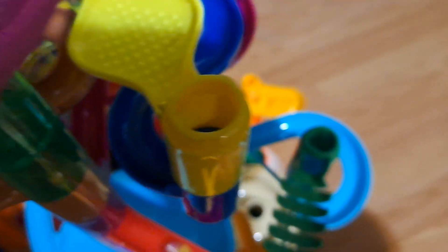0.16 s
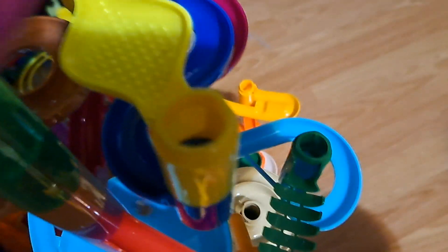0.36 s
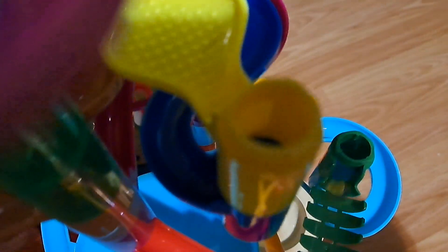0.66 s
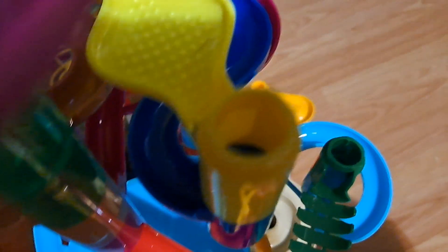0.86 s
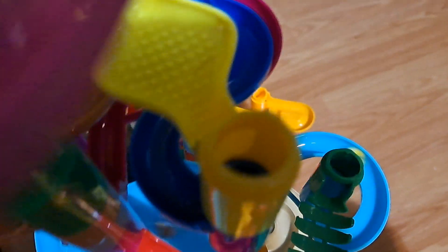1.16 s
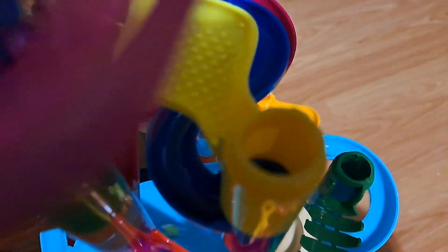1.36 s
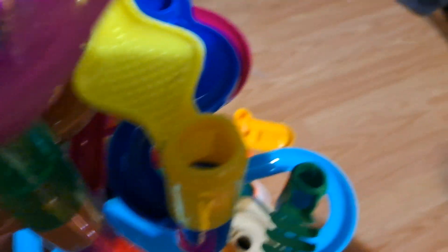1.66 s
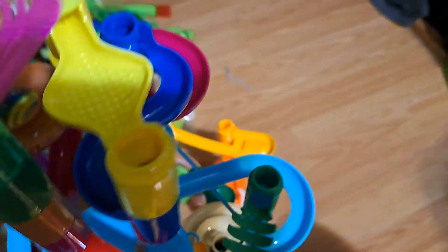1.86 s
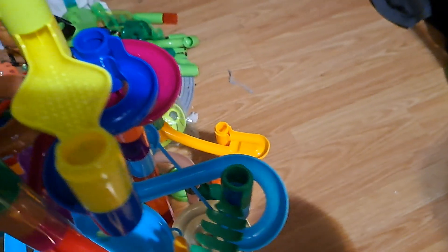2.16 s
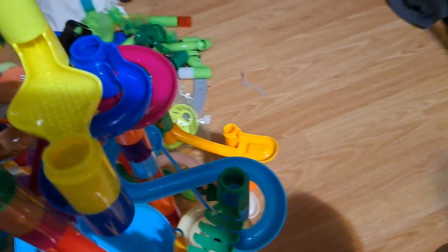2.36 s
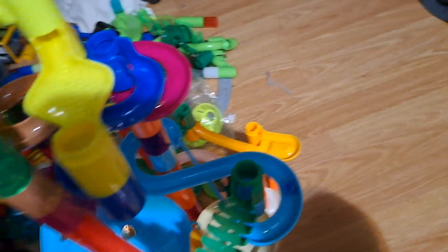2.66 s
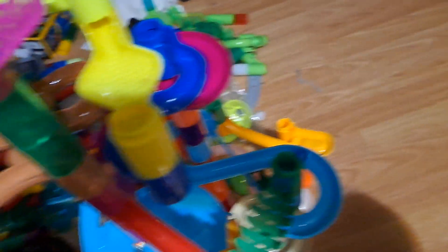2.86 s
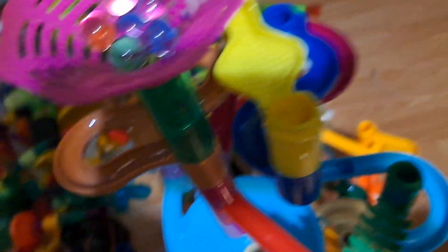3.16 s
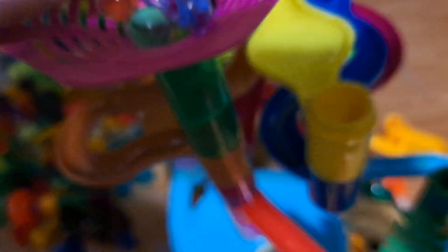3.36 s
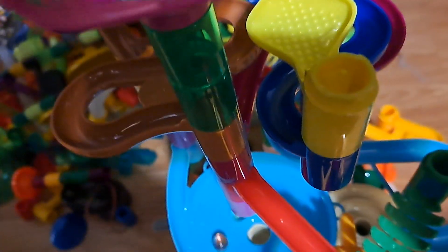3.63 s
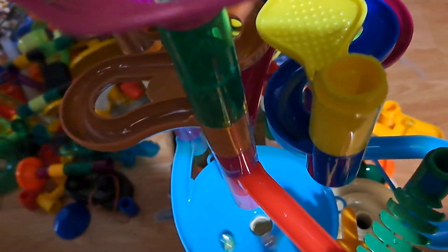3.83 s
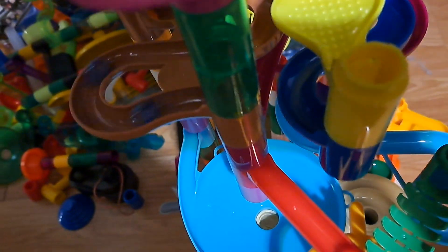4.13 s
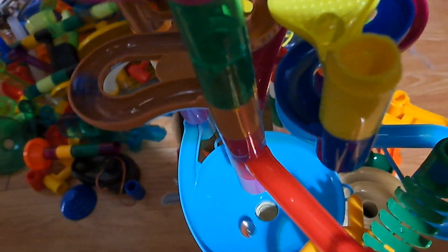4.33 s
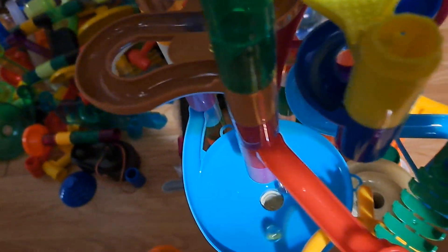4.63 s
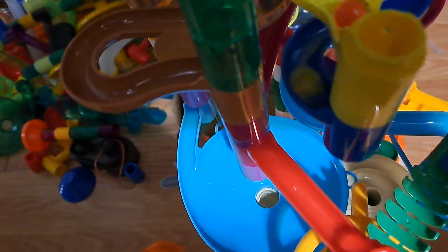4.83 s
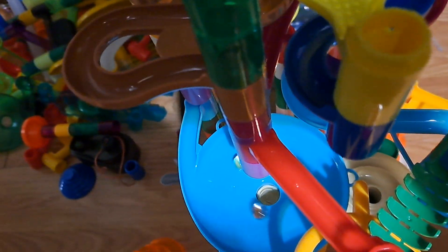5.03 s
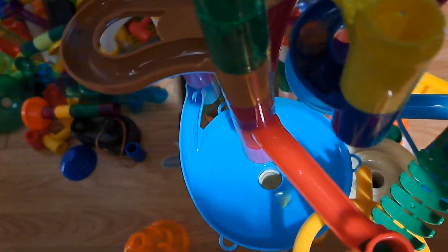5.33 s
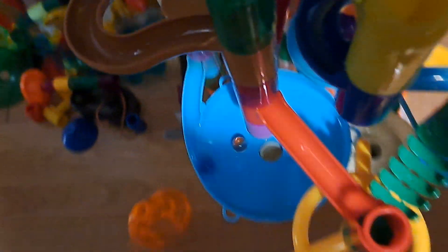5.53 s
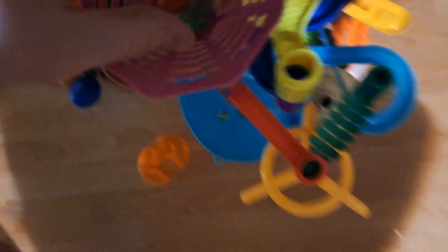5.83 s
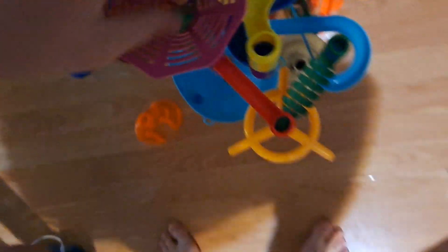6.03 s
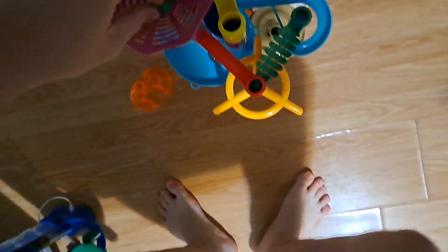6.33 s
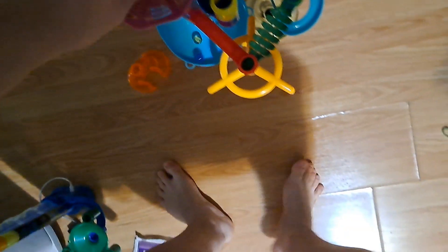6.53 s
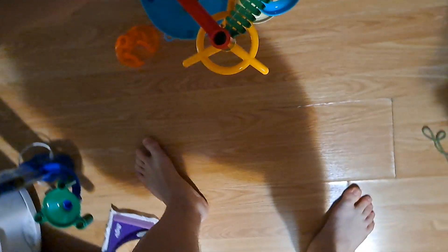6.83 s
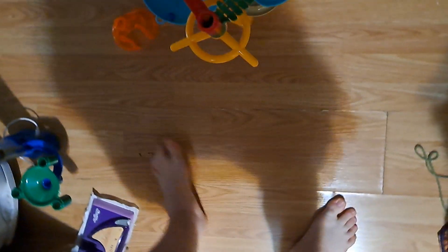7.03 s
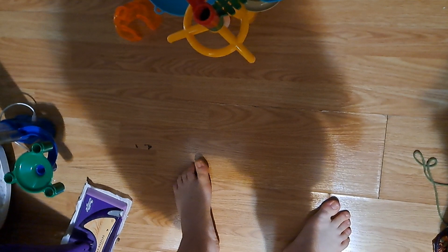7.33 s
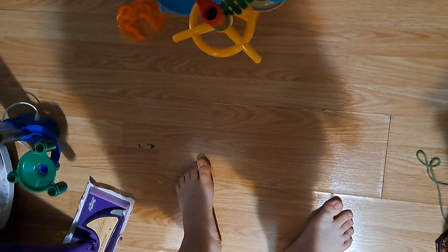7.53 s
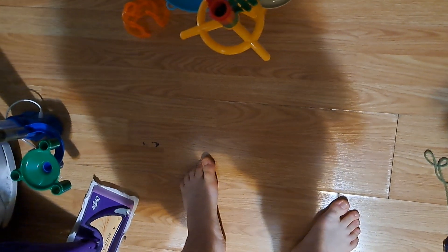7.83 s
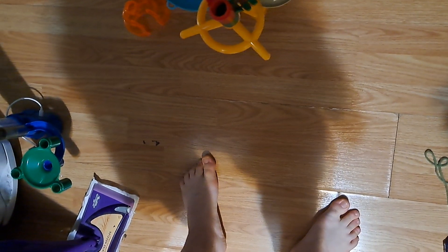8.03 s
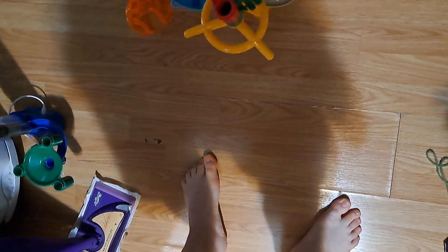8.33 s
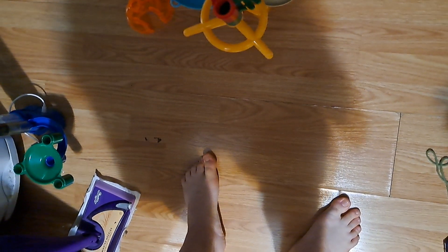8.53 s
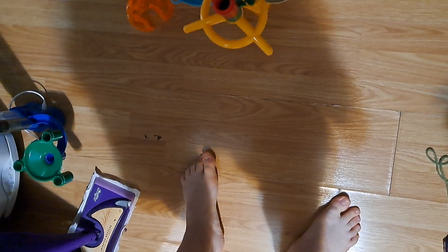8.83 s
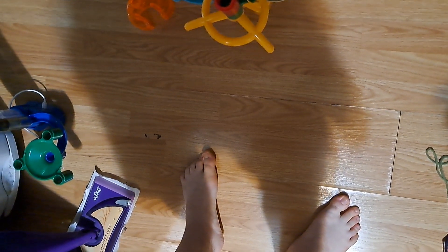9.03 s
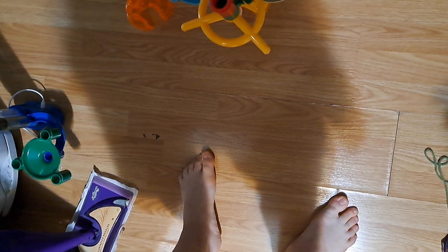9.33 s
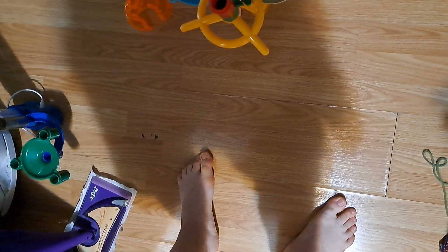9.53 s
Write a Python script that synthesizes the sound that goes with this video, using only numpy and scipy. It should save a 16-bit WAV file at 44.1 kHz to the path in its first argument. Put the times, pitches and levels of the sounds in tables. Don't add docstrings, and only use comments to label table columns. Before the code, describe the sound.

Close, bright clicking of many marbles on plastic track, first in scattered bursts, then a dense rattle that continues in uneven waves indoors.

```python
import sys
import numpy as np
from scipy import signal
from scipy.fft import rfft, irfft, next_fast_len
from scipy.io import wavfile
from scipy.ndimage import uniform_filter1d, minimum_filter1d, map_coordinates

SR = 44100
rng = np.random.default_rng(int(sys.argv[2]) if len(sys.argv) > 2 else 0)


def digitize_waveform(pressure):
    field = np.atleast_2d(pressure).T
    bounded = np.clip(field, -1, 1)
    quanta = np.round(bounded * 32767).astype(np.int16)
    wavfile.write(sys.argv[1], SR, quanta)


def voltage_ratio(decibels):
    exponent = np.asarray(decibels, float) / 20
    return 10 ** exponent


N = 426888


def unit(x):
    return x / np.sqrt(np.mean(x ** 2) + 1e-20)


def along(points, hz):
    f, v = np.transpose(points)
    return np.interp(np.log(hz + 1), np.log(f + 1), v)


def curves(rows):
    s, *columns = np.transpose(rows)
    return [np.interp(np.arange(N) / SR, s, column) for column in columns]


def wobble(rate):
    knots = rng.standard_normal(int(N * rate / SR) + 4)
    return map_coordinates(knots, [np.arange(N) * rate / SR])


def filtered(x, response):
    length = x.shape[-1]
    m = next_fast_len(length + min(length // 4, 8192))
    return irfft(rfft(x, m) * response(np.fft.rfftfreq(m, 1 / SR)), m)[..., :length]


def resonant(x, modes):
    def response(f):
        return sum(voltage_ratio(db) * 1j * f * w / (c * c - f * f + 1j * f * w) for c, w, db in modes)
    return unit(filtered(x, response))


def placed(times, shapes):
    out = np.zeros((2, N + shapes.shape[-1]))
    for s, shape in zip(times, shapes):
        out[:, int(s * SR):][:, :shape.shape[-1]] += shape
    return out[:, :N]


# f/Hz, level/dB per Hz
TRACK_COLOUR = [(180, -29.5), (790, -12), (1300, -7.5), (1790, -3.5), (2080, 1), (2500, 5.5), (3150, 7),
                (4000, 2.5), (4750, 4), (5350, 2.5), (6200, -8.5), (8940, -17), (11900, -13.5),
                (16000, -26)]
# f/Hz, level/dB
GLASS_NOTES = [(6500, 0), (7400, 3), (8900, -1.5), (10400, -1.5), (11700, 3.5), (13200, 0), (16000, 2.5)]


def impacts(db, hz, bright_db, ring_t60, crack_t60, glass_t60):
    t = np.arange(SR // 20) / SR
    rise = 1 - np.exp(-t / 0.00092)
    part_hz = hz[:, None, None]

    draw = rng.standard_normal((len(db), 1, 3, 2))
    detune = np.exp(draw[..., :1] * [[.01], [.04], [.04]])
    pitch = np.clip(part_hz[..., None] * detune, 1600, 5600)
    pitch[:, :, 2] *= np.where(hz > 3900, 3000 / hz, 4850 / hz)[:, None, None]
    phase = 2 * np.pi * (pitch * t + rng.random((len(db), 2, 3, 1)))
    mode_db = [[1], [4], [4]] * draw[..., 1:] - 60 * t / ring_t60 + [[0], [-3], [-5]]
    ring = (voltage_ratio(mode_db) * np.sin(phase)).sum(axis=2)

    noise = rng.standard_normal((len(db), 3, 2, len(t)))
    later = np.clip(t / 0.0025, 0, 1)
    chatter = voltage_ratio(later * (3 * unit(uniform_filter1d(noise[:, 2, :1], size=70)) - 4))

    def crack_colour(f):
        part_db = 6 * np.exp(-(np.log((f + 1) / part_hz) / .2) ** 2)
        return voltage_ratio(along(TRACK_COLOUR, f)) * voltage_ratio(part_db)

    def glass_colour(f):
        low_cut = 1 + (6800 / (f + 1)) ** 8
        return voltage_ratio(along(TRACK_COLOUR, f) + along(GLASS_NOTES, f)) / low_cut

    crack_decay = voltage_ratio(-60 * t / crack_t60) + voltage_ratio(-12 - 60 * t / 0.066)
    crack = unit(filtered(noise[:, 0], crack_colour)) * crack_decay
    glass = unit(filtered(noise[:, 1], glass_colour)) * voltage_ratio(-60 * t / glass_t60)

    body = rise * (voltage_ratio(-3) * ring + chatter * crack)
    peak = np.abs(body.sum(axis=1, keepdims=True)).max(axis=2, keepdims=True)
    body = body / peak * np.sqrt(2)
    tick = rise * chatter * voltage_ratio(bright_db)[:, None, None] * glass
    return voltage_ratio(db)[:, None, None] * (body + tick)


# t/s, peak level/dB, struck part f/Hz, glass brightness level/dB
MARBLE_CLICKS = [(0.0122, -3, 3240, -11.5), (0.0615, -1, 5200, -14), (0.0894, -7, 5330, -12),
                 (0.3296, -15, 3040, -14), (0.3955, -1, 3170, -10.5), (0.4091, -16, 3250, -20),
                 (0.4194, -11, 2540, -21), (0.4356, -5, 3530, -13), (0.4442, -13, 2400, -4),
                 (0.4671, -12, 2800, -15), (0.4811, -7.5, 3070, -8), (0.4955, -10, 3120, -14),
                 (0.5236, -9.5, 3100, -32), (0.7456, -4.5, 3540, -25), (0.7918, -3.5, 3230, -14),
                 (0.8231, -3, 3150, -13), (0.8483, -6.5, 4500, -23), (1.0598, -1, 2500, -18),
                 (1.0854, -5, 1670, -32), (1.1319, -11.5, 2180, -35), (1.177, -13, 2850, -36),
                 (1.255, 5.5, 3100, -17), (1.2646, -3, 5460, -40), (1.2747, -11, 2580, -6),
                 (1.2984, -7, 4600, -7), (1.3177, 0, 3130, -6), (1.3324, -15, 2910, -2),
                 (1.3641, -3, 3170, -12), (1.3903, -5.5, 5300, -12), (1.5057, -17, 3500, -5.5),
                 (1.6415, -14, 3120, -21), (1.7135, -5, 3350, -46), (1.7325, -4, 3040, -14),
                 (1.7685, -6.5, 5210, -21), (1.78, -7.5, 3080, -6), (1.8139, -3.5, 3170, -13),
                 (1.8354, -9.5, 3220, -15), (2.0926, -11, 3660, -23), (2.1484, 0, 3640, -14),
                 (2.1628, -2, 3480, -7), (2.1711, -14, 2910, -1), (2.1857, -7, 2980, -15),
                 (2.2296, -7, 2970, -21), (2.2528, -6, 3060, -9.5),
                 (2.3421, -1.5, 4600, -1), (2.436, -10.5, 3750, -42), (2.4444, -2, 4640, -16),
               (2.4733, -19, 4860, 2), (2.4864, -1.5, 3280, -10), (2.5313, -10.5, 3500, -10),
               (2.591, -1, 3170, -12), (2.6987, -3, 4500, -8), (2.7204, -20, 4170, -16),
               (2.7448, -6, 3220, -18), (2.766, -13.5, 2670, 4), (2.83, -4, 3280, -28),
               (2.8377, -12, 3350, -4), (2.8618, -7.5, 4340, -16), (2.889, -8, 4000, -6),
               (2.9012, 3, 3970, -13), (2.911, -9, 5080, -16), (2.9218, -6, 2430, -7),
               (2.944, -12.5, 2550, 1), (2.9664, -6, 4100, -15), (3.041, -15.5, 3190, 4),
               (3.064, -12, 3060, -8), (3.089, -12, 4300, -5), (3.126, -7.5, 2520, -8.5),
               (3.146, -5, 2520, -16), (3.163, -6, 3170, -10), (3.1924, -8, 2560, -9),
               (3.2303, -3, 5160, -19), (3.253, -18, 1970, -7), (3.288, -5, 2730, -16),
               (3.4027, -9, 3180, -28), (3.422, -16, 2900, -10), (3.437, -1.5, 4750, -17),
               (3.4486, -20, 2400, 5), (3.466, -10, 3270, 0), (3.5986, -14, 4610, -7),
                 (3.6791, -12, 2700, -8), (3.6903, -8, 3270, -1), (3.7044, -9.5, 3150, -1),
               (3.7202, -3.5, 2450, -7), (3.7285, -15, 2480, 3), (3.7344, -5, 3340, -13),
               (3.7452, -4, 3180, -7), (3.751, -13, 2900, -7), (3.7646, -9, 3260, -8),
               (3.7803, -11, 3290, -6), (3.7894, -8, 2880, -3), (3.8094, 5.5, 5300, -6),
               (3.8134, -13, 2900, -14), (3.8273, -2, 2960, -2), (3.8478, -7, 2980, -1),
               (3.8718, -9.5, 4750, -4), (3.9045, -1.5, 4640, -6), (3.9093, -14, 3100, -7),
               (3.922, -12, 2890, -2), (3.94, -12, 3250, -6), (3.9748, -4, 3750, -16),
               (4.025, -10.5, 3230, -11), (4.0386, -6.5, 4600, -14), (4.0531, -6, 2630, -18),
               (4.0663, -6.5, 3030, -8), (4.075, -2, 4130, -13.5), (4.115, -4.5, 5330, -22),
               (4.1472, -10, 2800, -12), (4.3038, -14, 4160, -4), (4.3146, -7, 5050, -6),
               (4.3478, -15, 2870, -13), (4.3723, -3, 4650, -19), (4.4196, -7, 3830, -14),
               (4.4479, -20, 2780, -3),
                 (4.5004, -14.5, 2620, -19), (4.5376, -4, 4140, -11), (4.5547, -7.5, 2540, -12),
                (4.565, -8.5, 3000, -6), (4.5815, -14, 2500, -8), (4.591, -2.5, 5160, -10),
                (4.612, -10, 2890, -22), (4.6184, -10, 2300, -23), (4.6523, -11, 2220, -8),
                (4.672, -13, 4580, -7), (4.6798, -10, 3170, -10), (4.7231, -4, 4340, -12),
                (4.761, -0.5, 5350, -11), (4.7796, 0, 5060, -14), (4.8065, 0.5, 4520, -13),
                (4.835, -10.5, 5100, -8), (4.9156, 0.5, 4370, -19), (4.952, -5, 3300, -7),
                (4.9612, -12, 3380, 1), (4.9707, -3, 5040, -10), (4.987, -15, 2880, -9),
                (4.993, -7, 2940, -20), (5.0222, -4, 2930, -18), (5.0413, -11, 2860, -2),
                (5.054, -7, 2950, -8), (5.0588, 1, 5200, -17), (5.093, -12, 4700, -4),
                (5.0997, -6, 4600, -9), (5.107, -1.5, 4730, -18), (5.1358, -11, 5150, -8),
                (5.1617, -4, 4730, -14), (5.2219, -5, 4840, -23), (5.2304, -9, 4740, -22),
                (5.247, -6, 4720, -26), (5.2878, -10, 4230, -26), (5.3013, -5.5, 3130, -15),
                (5.322, -8, 3160, -21), (5.33, -10, 3120, -10), (5.34, -12, 3170, -11),
                (5.3513, -2, 4500, -24), (5.359, -10, 2490, -5), (5.371, -5, 4900, -11),
                (5.3836, -13, 4900, -8), (5.427, -17, 4960, -13), (5.446, -5, 2960, -24),
                (5.4548, -2.5, 4650, -16), (5.464, -10, 4600, -15), (5.486, -12, 4500, -18),
                (5.507, -2, 2520, -33),
                 (5.629, -0.5, 4650, -17), (5.633, -21, 4700, -50), (5.648, -5, 2540, -34),
                 (5.7013, -13.5, 2520, -30), (5.8078, -28, 3190, 14.5), (5.8616, -7, 3890, -10),
                 (5.901, -11.5, 2960, -9), (5.9593, -13.5, 2820, -14), (6.146, -10, 4460, -10),
                 (6.1918, -7, 3240, -17), (6.2104, -4, 5040, -23), (6.2828, -6, 2860, -30),
                 (6.291, -2, 2900, -13), (6.3308, -5.5, 2850, -19), (6.379, 1, 5090, -28),
                 (6.3918, -10, 2840, -15), (6.4104, -7.5, 3300, -22), (6.452, -8, 2870, -18),
                 (6.5028, -2, 3080, -17), (6.599, -3.5, 3180, -12), (6.6563, -10.5, 3050, -16),
                 (6.816, -8.5, 1790, -17), (6.8567, 1.5, 2950, -19), (6.865, -14, 3000, -21),
                 (6.8776, -4, 2900, -21), (6.967, 2, 5020, -33), (7.05, -6.5, 2900, -15),
                 (7.065, -19, 2510, 12), (7.0739, -6.5, 5500, -17), (7.0826, -7, 2510, -6),
                 (7.1096, -2.5, 4750, -25), (7.152, -9, 3060, -5), (7.1803, -2.5, 2770, -15),
                 (7.3333, -8, 1800, -25), (7.3777, -7.5, 5070, -10), (7.413, -3.5, 2350, -12),
                 (7.438, -7, 2520, -10), (7.476, -11.5, 2560, 0), (7.5042, -3, 2450, -20),
                 (7.5346, -18, 2440, 8), (7.5655, 0, 5100, -18), (7.6187, 1.5, 4980, -10),
                 (7.7367, -10.5, 2450, -6),
                 (7.8688, -1, 3400, -24), (7.903, -12, 5040, -8), (7.9118, -3, 4850, -20),
                   (7.9531, -21, 3010, -9), (8.0046, -6, 4550, -19), (8.0657, -4, 3500, -17),
                   (8.286, -8.5, 4670, -4), (8.313, -11, 2760, -9), (8.349, 0.5, 2450, -21),
                   (8.3608, -4, 4700, -15), (8.3923, -8.5, 2530, -5), (8.4136, 0.5, 5000, -17),
                   (8.4478, -10, 3000, -17), (8.4788, 0, 2510, -12), (8.5206, 2.5, 4470, -22),
                   (8.575, -1.5, 4560, -5.5), (8.5915, -3.5, 4750, -21), (8.6053, -1.5, 2500, -21),
                   (8.672, -8, 4600, -10.5), (8.7168, -3, 2320, -16), (8.739, -5, 4950, -12),
                   (8.7635, -1.5, 5340, -13), (8.7895, -3.5, 2200, -22), (8.8266, -12, 2300, -13),
                   (8.8757, -9, 3200, -8), (8.902, -3, 3050, -8), (8.96, -2.5, 2450, -21),
                   (8.9838, -11, 2450, -7), (9.0223, -13, 2500, -11), (9.0406, -7, 2450, -15),
                   (9.1169, -3.5, 5000, -14), (9.144, -1, 5100, -30), (9.237, 3, 2480, -11),
                   (9.2727, -14, 2450, -5), (9.2833, -8, 2400, -11), (9.3022, -8.5, 3660, -13),
                   (9.4457, -8.5, 3160, -33), (9.4753, -0.5, 3490, -20), (9.518, -6.5, 4930, -16),
                   (9.6586, -5.5, 4340, -19)]


def clicks():
    click_db, shine_db = -3, 4.5
    s, db, hz, bright_db = np.array(MARBLE_CLICKS).T
    far = np.where(s > 6, 1.6, 1)
    level_db = db + click_db - 3 * (far - 1)
    stretch = far[:, None, None]
    return placed(s, impacts(level_db, hz, bright_db + shine_db, ring_t60=0.017,
                             crack_t60=0.019 * stretch, glass_t60=0.011))


# densest at t/s, rattle level/dB, thinning/dB per s, glass share level/dB
MARBLE_BATCHES = [(0, -25, 177, -6.5), (.42, -28.5, 45, -35), (.85, -33, 63, -43), (1.29, -31, 58, -17),
                  (1.74, -30, 70, -19), (2.17, -34, 37, -14), (2.731, -25.5, 130, -16),
                  (2.916, -19, 139, -8), (3.176, -20, 68, -13), (3.433, -25.5, 59, -4.5),
                  (3.738, -22.5, 40, -7), (4.38, -25, 93, -12), (4.57, -30.5, -8, -19),
                  (4.94, -25, 19, -13), (5.36, -25, 46, -16), (5.872, -26.5, 58, -16),
                  (6.21, -28, 16.5, -16), (6.4, -27, 65, -13.5), (6.88, -28, 103, -16),
                  (7.13, -23.5, 61, -11), (7.43, -26, 50, -19), (7.629, -19, 113, -14.5),
                  (7.94, -19.5, 62.5, -16), (8.3, -28, 25, -14), (8.43, -22, 32, -15),
                  (8.977, -23, 140, -15.5), (9.27, -30, 73, -32), (9.5, -27.5, 0, -18)]


def batches():
    gather_db_per_s, stray_db = 130, -38.5
    glass_fades = 0.35
    hop = 64
    s, db, thinning, glass_db = np.transpose(MARBLE_BATCHES)[..., None]
    since = np.arange(0, N, hop) / SR - s
    loss_db = np.where(since < 0, -gather_db_per_s * since, np.abs(thinning) * since)
    lead = np.argmax(db - loss_db, axis=0)[None]
    rattle_db = np.maximum(np.take_along_axis(db - loss_db, lead, axis=0)[0], stray_db)
    share_db = np.take_along_axis(glass_db - glass_fades * loss_db, lead, axis=0)[0]
    return np.repeat([rattle_db, share_db], hop, axis=1)[:, :N]


# f/Hz, width/Hz, level/dB
TOWER_MODES = [(640, 260, -1), (269, 81, -4)]


def shaken(s, db):
    blows = np.bincount((s * SR).astype(int), voltage_ratio(db), N)[:N]
    return resonant(blows, TOWER_MODES) * [[1], [0]]


PIECE_NOTES = np.array([1790, 2520, 3060, 3350, 4330, 5020])
# f/Hz, width/Hz, level/dB
BOWL_MODES = [(471.6, 22.4, 6.5), (788, 112, 11.5)]
# f/Hz, width/Hz, level/dB
TUBE_MODES = [(1800, 122, 37), (2450, 130, 31), (3280, 68, 26.5)]
# t/s, bowl level/dB, tube level/dB
HUM_LEVELS = [(0, -42.5, -39.5), (2.2, -43.5, -40.5), (3.6, -48.5, -43.5), (5.5, -46.5, -39),
              (6, -48.5, -42), (6.4, -49, -36.5), (7.5, -45.5, -34.5), (9.68, -47, -37.5)]


def rolling():
    rattle_db, glass_db = batches()
    count = 1000
    s, size, shine = rng.random((count, 3)).T
    s = s * N / SR
    bright_db = glass_db[(s * SR).astype(int)] + 9 * shine
    hz = rng.choice(PIECE_NOTES, count)
    bounces = placed(s, impacts(6 * size, hz, bright_db, ring_t60=0.021, crack_t60=0.025, glass_t60=0.025))

    def contact(rough_db, slow):
        roughness = wobble(150) + slow * wobble(14)
        return rng.standard_normal((2, N)) * voltage_ratio(rough_db * roughness)

    scrape = unit(filtered(contact(rough_db=5.5, slow=0.44), lambda f: voltage_ratio(along(TRACK_COLOUR, f))))
    swell_db = .35 * (rattle_db - rattle_db.mean())
    hum = 0
    for db, modes in zip(curves(HUM_LEVELS), [BOWL_MODES, TUBE_MODES]):
        hum = hum + voltage_ratio(db + swell_db) * resonant(contact(rough_db=4.5, slow=0.37), modes)
    rattle = 0.63 * unit(bounces) + 0.49 * scrape + 0.043 * shaken(s, 16 * size)
    return voltage_ratio(rattle_db) * rattle + hum


# first rib t/s, gap/s, rib count, peak level/dB
RIB_RUNS = [
    (0.5473, 0.014, 12, -16.5),
    (1.878, 0.024, 7, -20),
    (2.007, .0177, 5, -21),
    (4.171, 0.024, 5, -14),
]


def ribs():
    rib_hz, glass_db = 3170, -8.5
    scatter_s, scatter_db = 0.0006, 0.5
    ticks = [(first + k * gap, db) for first, gap, count, db in RIB_RUNS for k in range(round(count))]
    s, db = np.transpose(ticks)
    late, size, tone = rng.standard_normal((len(s), 3)).T
    shapes = impacts(db + scatter_db * size, rib_hz * (1 + .04 * tone), glass_db + 3 * tone,
                     ring_t60=.02, crack_t60=.02, glass_t60=.012)
    return placed(s + scatter_s * late, shapes)


# t/s, peak level/dB, f/Hz
TOWER_KNOCKS = [
    (0.523, -26, 507),
    (0.544, -26, 343),
    (0.631, -6, 250),
    (0.691, -5, 298),
    (1.059, -5, 640),
    (1.087, -7.5, 670),
    (1.128, -16, 640),
    (1.179, -17, 690),
    (1.218, -16, 690),
    (1.501, -21, 510),
]
# t/s, peak level/dB
FUNNEL_DROPS = [
    (4.398, -32),
    (5.361, -28),
    (5.891, -22.5),
    (9.476, -26),
]
# t/s, peak level/dB
TUBE_SONGS = [(0.014, -20), (5.1717, -20), (5.3475, -18), (5.5154, -17), (6.332, -19), (6.3797, -17),
              (6.4543, -21), (6.5112, -19), (6.6016, -16), (6.819, -21), (6.8655, -17.5), (6.99, -17.5),
              (7.5665, -20), (7.6196, -25), (7.8675, -14.5), (8.0113, -17.5), (8.5679, -15.5)]


def knocks():
    t = np.arange(SR // 6) / SR

    def thud_colour(f):
        return f ** 4 / (f ** 4 + 135 ** 4) / (1 + (f / 1700) ** 2)

    s, db, hz = np.transpose(TOWER_KNOCKS)
    ring = sum(np.sin(2 * np.pi * k * hz[:, None] * t) for k in (1, 2.4)) * voltage_ratio(-60 * t / 0.016)
    thud = unit(filtered(rng.standard_normal(ring.shape), thud_colour)) * voltage_ratio(-60 * t / 0.034)
    boom = np.sin(2 * np.pi * 145 * t) * voltage_ratio(-60 * t / 0.17) * np.tanh(t / 0.02)
    onset = np.tanh(t / np.where(hz < 320, .015, .0003)[:, None])
    blow = voltage_ratio(db - 4.0)[:, None] * (ring + 0.47 * thud + 0.077 * boom) * onset

    drop_s, drop_db = np.transpose(FUNNEL_DROPS)
    hollow_note = np.sin(2 * np.pi * 462 * t) * voltage_ratio(-60 * t / .05) * np.tanh(t / .002)
    hollow = voltage_ratio(drop_db)[:, None] * hollow_note

    sing_s, sing_db = np.transpose(TUBE_SONGS)
    note_hz = TUBE_MODES[0][0] * (1 + .01 * rng.standard_normal((len(sing_s), 1)))
    song_decay = voltage_ratio(-60 * t / 0.055) * np.tanh(t / 0.0017)
    song = voltage_ratio(sing_db)[:, None] * np.sin(2 * np.pi * note_hz * t) * song_decay

    every = np.vstack([blow, hollow, song])
    return placed(np.r_[s, drop_s, sing_s], np.stack([every, 0 * every], axis=1))


# t/s, length/s, level/dB
GRIP_SHIFTS = [
    (3.718, 0.033, -44),
    (5.91, 0.38, -54),
    (7.567, 0.14, -53),
    (8.622, 0.32, -47.5),
]


def handling():
    t = np.arange(N) / SR
    shifts = sum(voltage_ratio(db) * np.exp(-(2 * (t - s) / length) ** 4) for s, length, db in GRIP_SHIFTS)
    grip = voltage_ratio(-81.0) + shifts

    def rumble_colour(f):
        return f ** 4 / (f ** 4 + 38 ** 4) / (1 + (f / 85) ** 3)

    rumble = filtered(rng.standard_normal((2, N)), rumble_colour)
    return grip * voltage_ratio(2 * wobble(20) + [[-8], [5]]) * unit(rumble)


# f/Hz, t60/s
ROOM_DECAY = [(300, 0.31), (2000, 0.19), (12000, 0.03)]


def room(x):
    step = SR // 4
    out = np.zeros((2, N + 2 * SR))
    for start in range(0, N, step):
        hz, t, z = signal.stft(rng.standard_normal((2, SR // 3)), SR, nperseg=256)
        decay = voltage_ratio(-60 * t / along(ROOM_DECAY, hz)[:, None])
        tail = signal.istft(z * decay, SR, nperseg=256)[1]
        wet = signal.fftconvolve(x[:, start:start + step], tail / np.linalg.norm(tail[0]), axes=1)
        out[:, start + 150:][:, :wet.shape[1]] += wet
    return out[:, :N]


# f/Hz, level/dB per Hz
AIR_COLOUR = [(40, -18), (300, -14.5), (900, -8.5), (3000, -0.5), (16000, -88)]


def room_tone():
    hiss = filtered(rng.standard_normal((2, N)), lambda f: voltage_ratio(along(AIR_COLOUR, f)))
    return voltage_ratio(-46.5) * unit(hiss)


# f/Hz, level/dB
PORT_BALANCE = [(200, -1.5), (700, 1), (1290, 2.5), (2380, 11.5), (4400, 15), (8120, 0.5), (15000, 3.5)]
# f/Hz, correlation/1
PORT_LIKENESS = [(60, 0.71), (240, 0.97), (950, 0.75), (3770, 0.12), (15000, 0.024)]


def ports(paths):
    def spread(hz):
        turn = np.arccos(np.clip(along(PORT_LIKENESS, hz), -1, 1)) / 2
        return np.array([np.cos(turn), np.sin(turn)])

    def share(hz, sign):
        return 1 / np.sqrt(1 + voltage_ratio(-2 * sign * along(PORT_BALANCE, hz)))

    def balance(hz):
        delay = np.exp(-2j * np.pi * hz * 7e-5)
        return 2 * np.array([share(hz, 1) * delay, share(hz, -1)])

    mid, side = filtered(paths, spread)
    return filtered(np.array([mid + side, mid - side]), balance)


def scene():
    run = clicks() + rolling() + ribs() + knocks()
    heard = run + voltage_ratio(-7.5) * room(run)
    heard = filtered(heard, lambda f: (1j * f / (1j * f + 130)) ** 2)
    return ports(heard + room_tone()) + handling()


def low_pass(x):
    return signal.sosfilt(signal.butter(12, 16830, fs=SR, output="sos"), x)


def record(dry):
    need = np.minimum(1, .99 / (np.abs(dry).max(axis=0) + 1e-9))
    gain = uniform_filter1d(minimum_filter1d(need, size=61), size=31)
    mix = filtered(dry * gain, lambda f: voltage_ratio(-25 * (f > 15900)))
    return low_pass(mix)


dry = scene()
out = record(dry)
digitize_waveform(out)
```